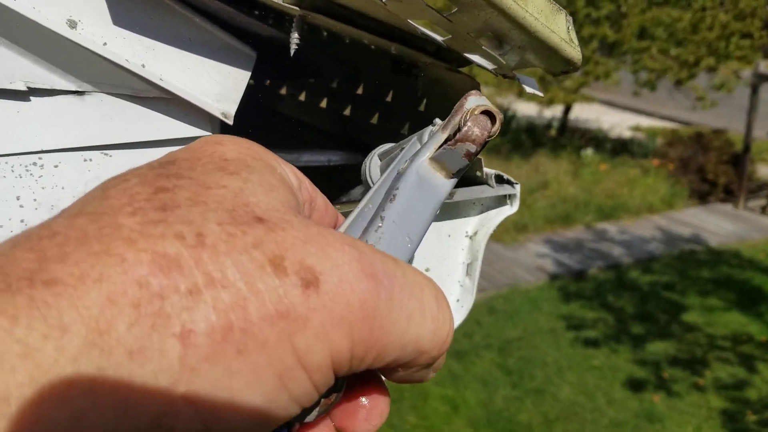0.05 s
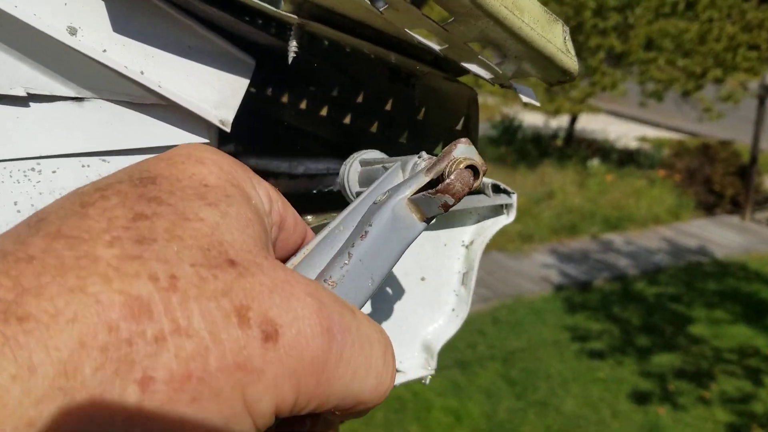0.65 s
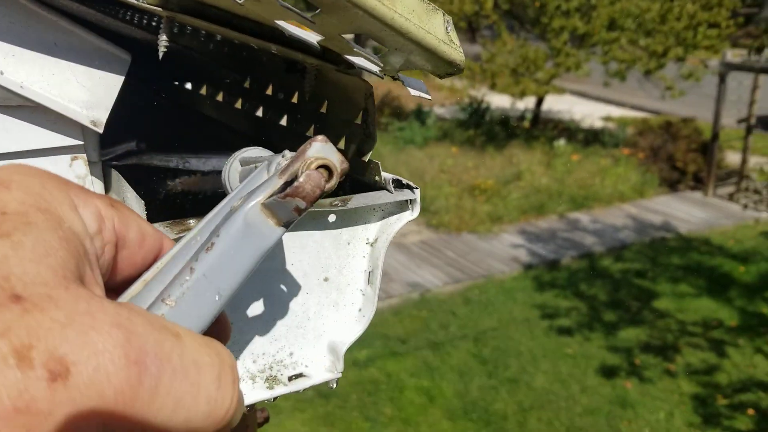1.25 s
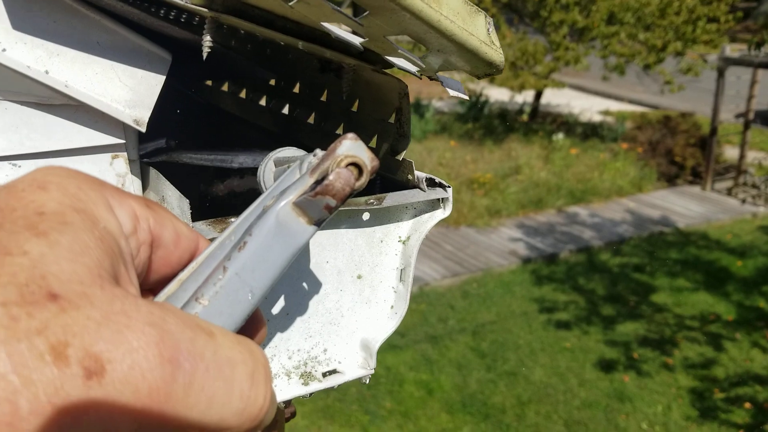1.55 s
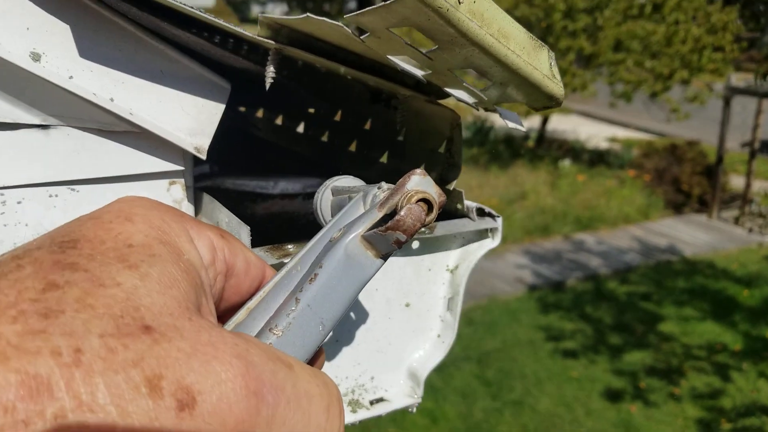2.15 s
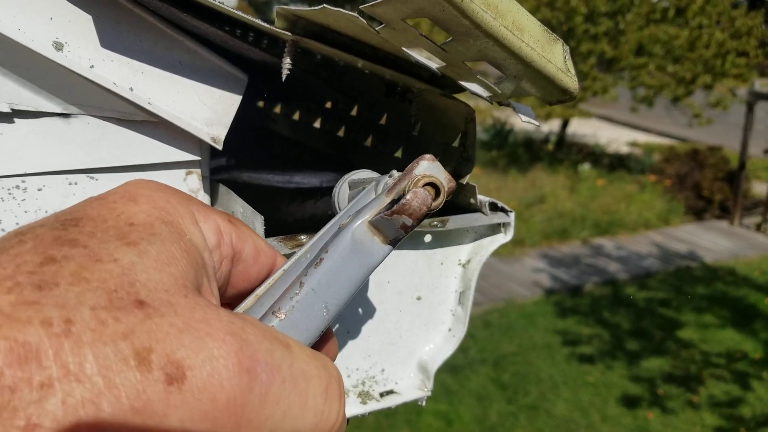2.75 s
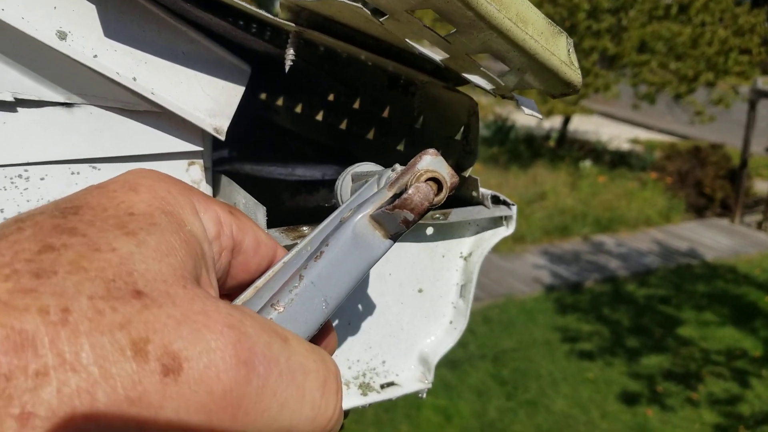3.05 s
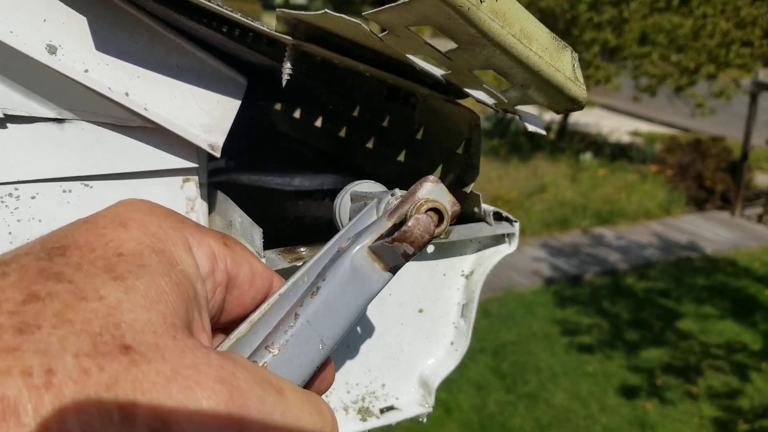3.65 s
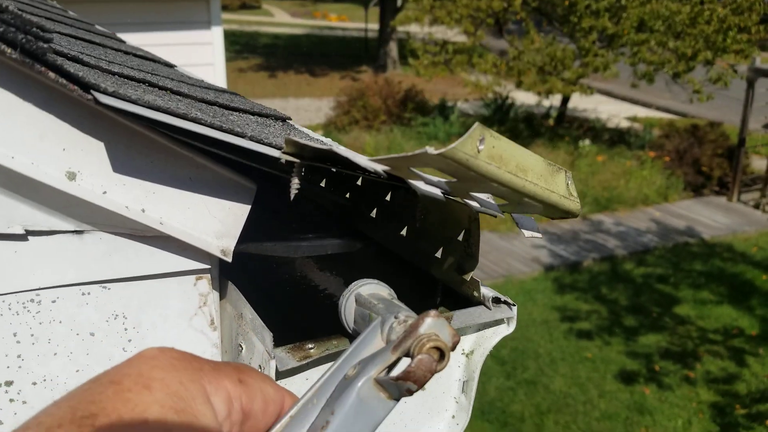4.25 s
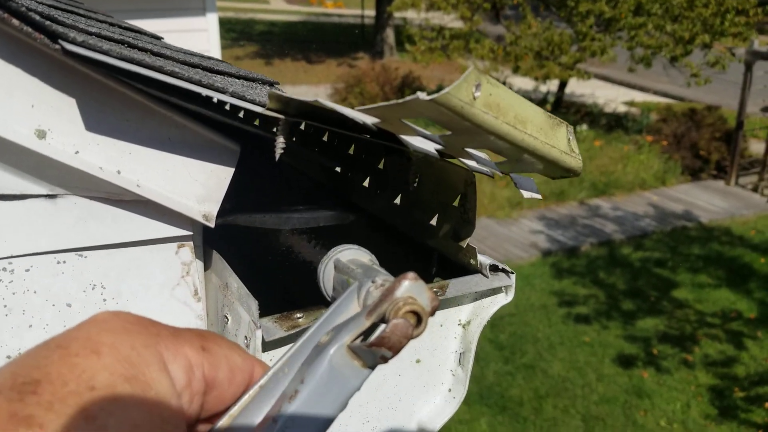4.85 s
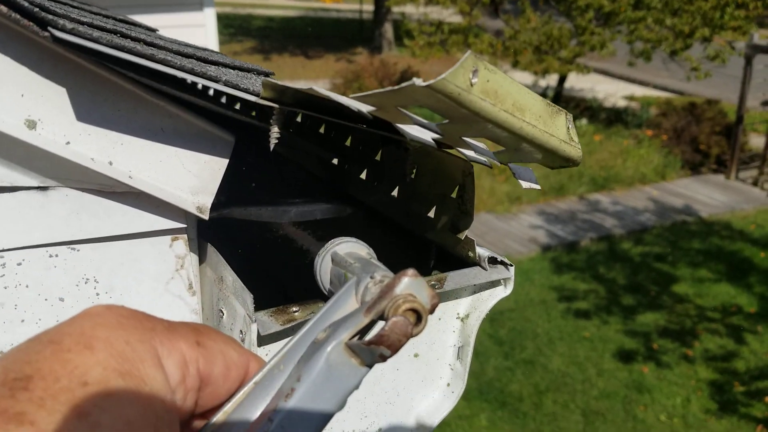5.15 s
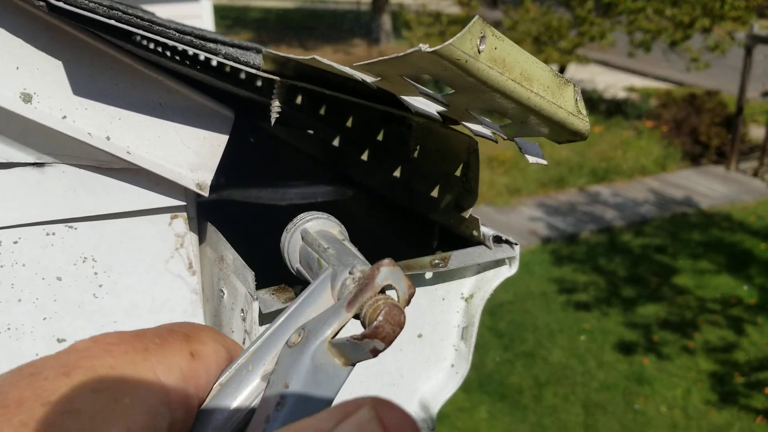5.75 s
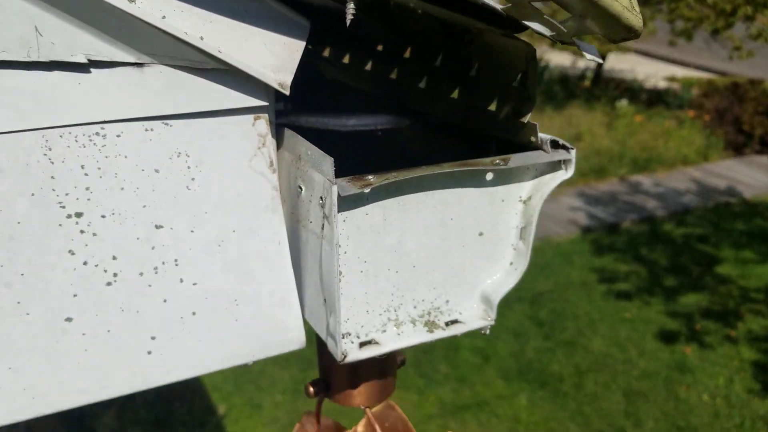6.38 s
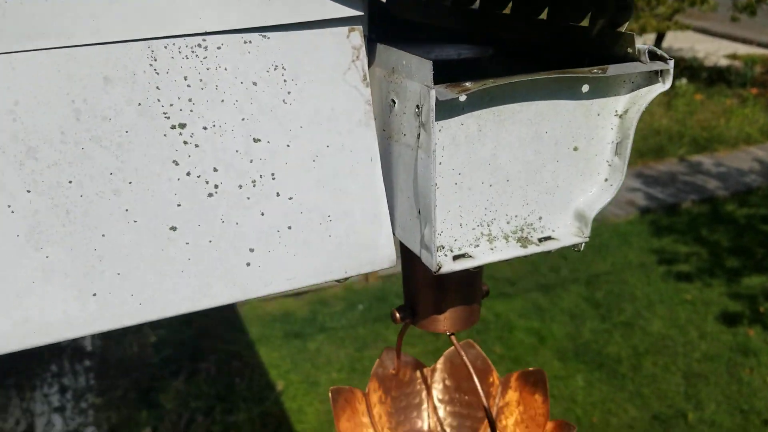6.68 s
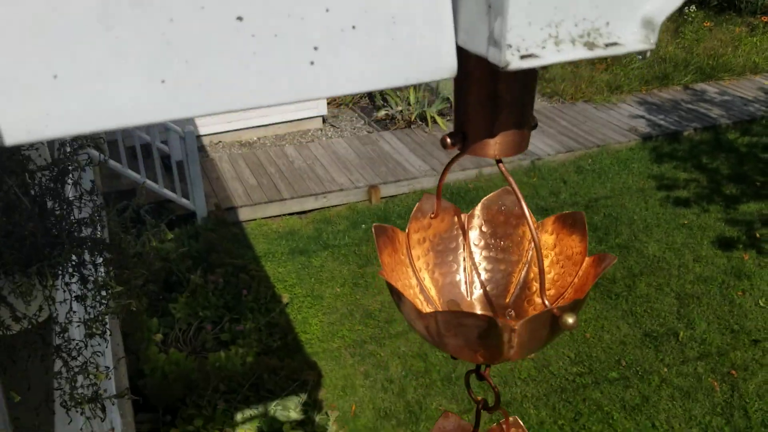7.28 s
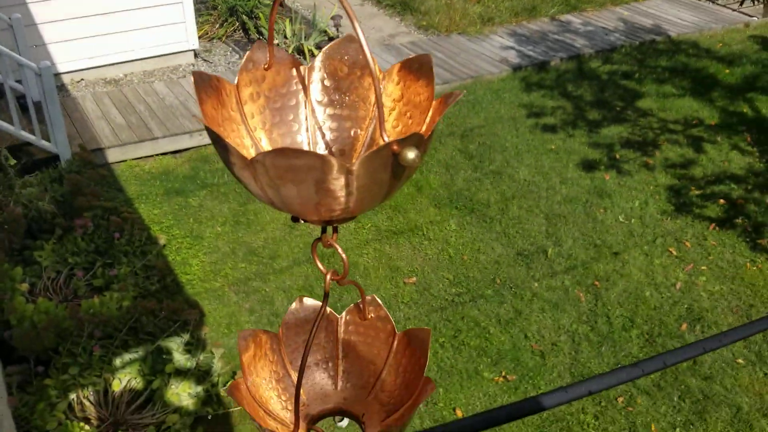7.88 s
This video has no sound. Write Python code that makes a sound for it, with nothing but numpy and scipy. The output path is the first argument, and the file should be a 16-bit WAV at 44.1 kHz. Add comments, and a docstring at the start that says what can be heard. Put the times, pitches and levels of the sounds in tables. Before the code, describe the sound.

A hose gun sprays into a metal gutter and shuts off with a whistle, then hose and gun scrape and knock against a metal ladder.

```python
"""In a quiet garden, a hose gun sprays into a sheet-metal roof gutter close by.
The drops hiss and drum on the metal, and a pool builds up and churns. The closing valve whistles
and spits, then the water drains off. The hose is lowered: it rasps over a hollow metal ladder,
and the gun knocks against it so that the rails ring. The air rumbles softly and a far engine hums."""
import sys
import numpy as np
from scipy import signal
from scipy.fft import rfft, irfft, next_fast_len
from scipy.io import wavfile

SR = 44100
rng = np.random.default_rng(int(sys.argv[2]) if len(sys.argv) > 2 else 0)


def wav_record(signal):
    """Record a signal, one row per channel, as 16-bit PCM in the file named by sys.argv[1]."""
    frames = np.transpose(np.atleast_2d(signal))
    bounded = np.clip(frames, -1, 1)
    # unit amplitude maps onto the largest positive 16-bit level
    quanta = np.round(bounded * 32767).astype(np.int16)
    wavfile.write(sys.argv[1], SR, quanta)


N = 358091
TIME = np.arange(N) / SR
SIZE = next_fast_len(N + SR // 4)
HZ = np.maximum(np.arange(SIZE // 2 + 1) * SR / SIZE, 1)   # the pitches of a spectrum
SWING_S, SWING_TAKES_S = 1.327, 0.088   # the jet swings from the gutter's wall onto its floor
SHUT_S = 5.52   # the valve is fully shut

# How alike left and right sound: pitch_hz, likeness (1 = the same)
LIKENESS = [(60, .72), (130, .84), (300, .96), (640, .9), (1400, .68), (3000, .55), (7000, .4), (15000, .4)]
# The jet catches an edge and flares: start_s, length_s, splash_lift_db, low_lift_db, high_lift_db
FLARES = [(-.1, 0.45, 5.5, 6.5, 2.5), (.75, 0.36, 3.5, 7, 7.5), (1.17, 0.095, 4, -13, 4.5),
          (1.5, 0.36, 2.5, 2, -4), (1.96, 0.26, 1, 13, -9), (4.44, 0.35, 1.8, 6, 0)]
# Notes at which the gutter's metal sheet rings: pitch_hz, width_hz, level_db
GUTTER_NOTES = [(572, 45, -7.5), (676, 34.6, 4), (835, 28, -4.5), (897, 22, 0.5), (991, 68, 0.5),
                (1355, 90, -0.5), (1492, 52, 2.5), (1551, 53, 1.5), (1818, 87, -4.5), (1957, 50, -1),
                (2185, 60, -3)]
# Notes of the gutter's hollow, stirred by pooled water: pitch_hz, width_hz, level_db
HOLLOW_NOTES = [(318, 27.8, -1.5), (394, 33.4, -2.5), (448, 47.5, 0), (528, 48, -1.5)]
# Notes at which the ladder rings: pitch_hz, width_hz, level_db
LADDER_NOTES = [(466, 21.6, 3.5), (494, 41, 0), (665, 86, -7), (755, 60, -2.5), (925, 21, 5),
                (1006, 16, 5.5), (1084, 22, 2), (1127, 8, 6), (1158, 140, -4), (1555, 36, 5),
                (1623, 13, -3), (2016, 14, 11.5), (2144, 69, 8), (2364, 41, 9), (2557, 40, 4.5),
                (2690, 12, 10.5), (2999, 13, 0), (3250, 33, 7.5), (3020, 1400, -6.5), (3450, 10, -4),
                (3480, 18, 5), (3800, 26, 5.5), (4334, 17, 3), (5330, 57, 1), (5810, 130, -3),
                (6230, 85, -7), (7050, 170, -10), (7280, 73, 1), (8010, 70, -3)]
# Tone of bare contact with the ladder, without ringing: pitch_hz, level_db
GRIT_TONE = [(60, -29), (300, -7), (900, -12.5), (1400, 3.5), (2500, -2.5), (5500, 5.5), (9000, 2),
             (13000, 4), (15800, 3)]


def from_db(db):
    """Turn decibels into a number to multiply by."""
    return 10 ** (np.asarray(db) / 20)


def ramp(start_s, takes_s):
    """Rise evenly from 0 to 1."""
    return np.clip((TIME - start_s) / takes_s, 0, 1)


def envelope(start_s, attack_s, length_s, fade_s):
    """Rise, hold until length_s after the start, then fade. A fade_s is always the time to lose 60 dB."""
    return ramp(start_s, attack_s) * from_db(-60 * np.clip((TIME - start_s - length_s) / fade_s, 0, 3))


def lifts(rows, attack_s, fade_s):
    """The decibels that events add over time, one curve for each of their dB columns."""
    return sum(np.outer(db, envelope(start_s, attack_s, length_s, fade_s))
               for start_s, length_s, *db in rows)


def over_time(points):
    """Join (time_s, value) points into a curve over time."""
    return np.interp(TIME, *np.transpose(points))


def over_hz(points):
    """Join (pitch_hz, value) points into a curve over pitch."""
    hz, value = np.transpose(points)
    return np.interp(np.log(HZ), np.log(hz), value)


def colour(x, db):
    """Turn each pitch up or down by db, with no sound ahead of its cause (a minimum-phase filter)."""
    cepstrum = irfft(np.log(from_db(db)), SIZE)
    cepstrum[1:SIZE // 2] *= 2
    cepstrum[SIZE // 2 + 1:] = 0
    return irfft(rfft(x, SIZE) * np.exp(rfft(cepstrum)), SIZE)[..., :N]


def band(x, low_hz, high_hz):
    """Keep the pitches between two limits."""
    return signal.sosfilt(signal.butter(2, [low_hz, high_hz], "band", fs=SR, output="sos"), x)


def unit(x):
    """Scale a stereo sound so that the average of its two sides has strength (rms) 1."""
    return x / (np.std(x.mean(0)) + 1e-12)


def drift(rate_hz):
    """Smooth random wandering, typically of size 1."""
    slow = irfft(rfft(rng.standard_normal(SIZE)) / (1 + (HZ / rate_hz) ** 2), SIZE)[:N]
    return slow / slow.std()


def resonate(x, notes):
    """Let x set an object's notes ringing; narrower notes ring longer."""
    out = 0
    for k, (hz, width_hz, db) in enumerate(notes):
        decay = np.exp(-np.pi * width_hz / SR)
        gain = (-1) ** k * from_db(db) * (1 - decay ** 2) / 2
        feedback = [1, -2 * decay * np.cos(2 * np.pi * hz / SR), decay ** 2]
        out = out + signal.lfilter([gain, 0, -gain], feedback, x)
    return out


def noise():
    """Stereo white noise, its two sides more alike in the bass than in the treble."""
    alike = np.clip(over_hz(LIKENESS), 0, 1)
    mid, side = rfft(rng.standard_normal((2, SIZE)))
    return irfft(mid + np.sqrt((1 - alike) / (1 + alike)) * side * [[1], [-1]], SIZE)[:, :N]


def grains(per_s, spread_db, life_s):
    """Tiny hits at random moments, mostly small and a few large, each a brief burst of noise."""
    sizes = from_db(spread_db * np.minimum(rng.exponential(1, N), 5))
    energy = (rng.random(N) < per_s / SR) * sizes ** 2
    bursts = signal.lfilter([1], [1, -np.exp(-2 / (life_s * SR))], energy + 1e-12)
    return unit(noise() * np.sqrt(bursts))


def spot_ring(drops, hz, width_hz):
    """The metal around the struck spot rings at a pitch that moves."""
    turn = np.exp(2j * np.pi * np.cumsum(hz) / SR)
    shifted_down = band(drops, 0.76 * hz.min(), 1.11 * hz.max()) / turn
    smoothed = signal.lfilter([1], [1, -np.exp(-np.pi * width_hz / SR)], shifted_down)
    return unit((smoothed * turn).real)   # shifted back up


def taps(per_s, spread_db):
    """Single fat drops snap on the bare metal."""
    sizes = from_db(spread_db * np.minimum(rng.exponential(1, N), 3)) * rng.choice([-1, 1], N)
    clicks = sizes * (rng.random(N) < per_s / SR)
    return unit(band(clicks, 1000, 8800) * np.ones((2, 1)))


def hiss(on_floor, closing):
    """Thousands of drops a second hiss and splash; those thrown back make the walls ring."""
    # Tone of the fine mist: pitch_hz, level_db
    mist_tone = [(4060, -29.5), (6900, -8), (7660, -13), (9170, -3), (10300, -1.5), (11500, 4.5),
                 (12900, 5), (15400, 3.5), (16300, -9)]
    # Tone of the splash: pitch_hz, level_db
    splash_tone = [(1410, -17.5), (2400, -1), (2690, -0.5), (3070, -4), (3300, -2), (4090, -1), (4440, 1.5),
                   (4880, -2.5), (5850, 0.5), (7650, -12.5), (8000, -9.5), (10400, -19), (17600, -120)]
    # How the mist swells and sinks: time_s, relative_level_db
    mist_swell = [(0.0, -23.5), (0.06, -25), (0.4, -31.5), (0.92, -31), (1.36, -32.5), (1.39, -33),
                  (1.72, -30), (4.8, -26), (5.15, -28)]
    # Note of the struck spot, moving with the aim: time_s, pitch_hz
    spot_pitch = [(.36, 3440), (.43, 2750), (1.2, 2640), (2.1, 3380), (3.6, 3600), (3.95, 4200),
                  (4.9, 4200), (5.3, 3560)]
    drops = grains(per_s=10000, spread_db=2, life_s=0.00062) * from_db(0.58 * drift(27))
    rebound = grains(per_s=7400, spread_db=2, life_s=0.00012)
    flare_db, low_lift_db, high_lift_db = lifts(FLARES, attack_s=0.066, fade_s=0.32)
    low_hz = over_time(spot_pitch)
    middle_hz = 5750 * (low_hz / 3560) ** 0.18
    top_hz = 12500 * (low_hz / 3560) ** 0.87
    low_gain = from_db(-6.5 - 12.5 * on_floor + low_lift_db)   # the wet floor damps the two lower rings
    middle_gain = from_db(1 - 5 * on_floor + high_lift_db)
    top_gain = from_db(-14 + 1.5 * on_floor + high_lift_db)
    low_ring = low_gain * spot_ring(rebound, low_hz, width_hz=450)
    middle_ring = middle_gain * spot_ring(rebound, middle_hz, width_hz=750)
    top_ring = top_gain * spot_ring(rebound, top_hz, width_hz=580)
    patter = from_db(-9) * low_gain * unit(band(drops, 1080, 2400))
    # dividing lets the rings colour the hiss without making it louder
    mist = (unit(colour(drops, over_hz(mist_tone))) + top_ring) / np.hypot(1, top_gain)
    splash = unit(colour(drops, over_hz(splash_tone))) + low_ring + middle_ring + patter
    splash /= np.sqrt(1 + low_gain ** 2 + middle_gain ** 2)
    splash += from_db(-12) * taps(per_s=130, spread_db=3.5)
    mist_db = over_time(mist_swell) + 1.5 - 3.5 * closing + 0.5 * drift(15)
    splash_db = -33 + 2.5 * on_floor + flare_db - 5.5 * closing + 0.45 * drift(27)
    return from_db(mist_db) * mist + from_db(splash_db) * splash


def drumming(on_floor, closing):
    """Heavier lumps of water drum on the metal and churn in the hollow, louder as a pool builds up."""
    # The pool sloshes: start_s, length_s, lift_db
    sloshes = [(.62, .5, 4.5), (1.95, 0.051, 4), (2.4, .13, 4), (4.94, 0.057, 6), (5.12, 0.076, 3)]
    fill_s = 0.53
    pool = 1 - np.exp(-np.maximum(TIME - SWING_S - SWING_TAKES_S, 0) / fill_s)
    slosh_db, = lifts(sloshes, attack_s=0.082, fade_s=0.19)
    flare_db = lifts(FLARES, attack_s=0.066, fade_s=0.32)[0]
    wall_shake_db = 1.24 * flare_db * (1 - on_floor)
    drum_db = -52 + 14 * on_floor + 5.5 * pool + wall_shake_db - 9 * closing
    churn_db = -48 + 4 * on_floor + 7 * pool + slosh_db - 8 * closing
    lumps = grains(per_s=2000, spread_db=1.5, life_s=0.001)
    drum = from_db(drum_db) * unit(resonate(lumps, GUTTER_NOTES))
    churn = from_db(churn_db) * unit(band(resonate(lumps, HOLLOW_NOTES), 206, 550))
    return drum + churn


def spray():
    """The jet strikes the gutter's wall, then its floor, and weakens and stops as the valve shuts."""
    on_floor = ramp(SWING_S, SWING_TAKES_S)
    closing = ramp(start_s=5.15, takes_s=0.29)
    flow = from_db(-60 * np.clip((TIME - SHUT_S) / 0.1, 0, 2))
    mid_swing = ramp(SWING_S - 0.054, 0.054) * (1 - on_floor)   # the jet finds little to strike
    falter = envelope(start_s=5.34, attack_s=0.025, length_s=0.057, fade_s=0.06)
    dip_db = -2 * (mid_swing + falter)
    return flow * from_db(dip_db) * (hiss(on_floor, closing) + drumming(on_floor, closing))


def garden_air():
    """A low outdoor rumble, louder down by the ladder than up at the gutter."""
    # Tone of the garden air: pitch_hz, level_db
    air_tone = [(15, -59), (25, -23), (54, 3), (112, -1), (156, -5), (261, -11), (487, -18.5), (830, -24),
                (1090, -13), (1180, -27), (2000, -40), (2600, -78), (4400, -120)]
    lowered = ramp(start_s=5.2, takes_s=2.3)
    level_db = -55.5 + 5.5 * lowered + 2.6 * drift(4.5)
    return from_db(level_db) * unit(colour(noise(), over_hz(air_tone)))


def far_engine(pitch_hz):
    """A far engine idles on one wavering note, then swells once."""
    phase = 2 * np.pi * np.cumsum(pitch_hz + 0.8 * drift(4.7)) / SR
    swell = envelope(start_s=7.52, attack_s=0.22, length_s=0.33, fade_s=1.5)
    effort = from_db(-67.5) + from_db(-47.5) * swell
    return effort * from_db(1.5 * drift(5)) * np.sqrt(2) * np.sin(phase)


def plops(swell_s):
    """Short, round tones: soft bumps of the hand, a gulp of water, a drip and the ladder's low boom."""
    # One tone a row: start_s, pitch_hz, peak_db, fade_s, glide_octaves_per_s
    tones = [(1.215, 62, -41, .2, 0), (5.426, 625, -26.5, 0.05, 1), (6.299, 66, -42, 0.1, -7),
             (7.662, 4570, -46, .04, -12), (7.805, 332, -40, 0.46, 1)]
    out = np.zeros(N)
    for start_s, hz, peak_db, fade_s, glide in tones:
        t = np.clip(TIME - start_s, 0, 0.5)
        shape = (1 - np.exp(-t / swell_s)) * from_db(-60 * t / fade_s)
        phase = 2 * np.pi * hz * t * 2 ** (glide * t / 2)
        out += from_db(peak_db) * shape / shape.max() * np.sin(phase)
    return out


def valve():
    """Water squeezed through the closing valve whistles hoarsely, then spits out a last spurt."""
    # Notes of the narrowing gap: pitch_hz, width_hz, level_db
    valve_notes = [(5620, 140, 6), (11400, 260, -9), (3100, 62, -1)]
    whistle = from_db(-26.5) * unit(resonate(noise(), valve_notes))
    whistle *= envelope(start_s=5.259, attack_s=0.071, length_s=0.093, fade_s=0.05)
    rush = noise()
    mist = from_db(-22) * unit(band(rush, 10000, 14600))
    spit = from_db(-29) * unit(band(rush, 2000, 7500))
    return whistle + (mist + spit) * envelope(start_s=5.3, attack_s=0.03, length_s=0.04, fade_s=0.08)


def metal_shimmer(x, fade_s, ring_db):
    """Thin metal has countless faint notes, so a short shimmer follows every touch."""
    t = TIME[:SR // 3]
    shimmer = band(rng.standard_normal((2, len(t))), 1200, 19400) * from_db(-60 * t / fade_s)
    shimmer *= from_db(ring_db) / np.sqrt(np.sum(shimmer ** 2) / 2)
    return (x + signal.fftconvolve(x, shimmer, axes=1)[:, :N]) / np.hypot(1, from_db(ring_db))


def knocks():
    """The gun and hose hit the ladder: each crack and rattle has a ping and a thud, and the rails ring."""
    # Knocks, catches and squeaks (thud and ping levels are relative to the treble):
    # start_s, level_db, thud_hz, thud_db, ping_hz, ping_width_hz, ping_db, fade_s
    hits = [(5.415, -17, 910, -6, 6500, 900, -17, 0.022), (5.7348, -37.5, 500, 5, 3560, 40, -2, 0.055),
            (5.7603, -26.5, 497, -3, 3630, 32, -5, 0.17), (5.978, -34, 2840, -8, 640, 43, 7, 0.12),
            (6.019, -39.5, 3140, 2, 646, 16, 10, .2), (6.0915, -39.5, 900, -6, 3780, 60, -9, 0.13),
            (6.235, -43, 900, -14, 5900, 300, 0, .08), (6.610, -18.5, 1000, -12, 5380, 340, 1, 0.12),
            (6.628, -18.5, 1000, -1, 4020, 220, -1, 0.1), (6.7175, -13, 1170, -0.5, 3510, 45, -9, 0.059),
            (6.785, -27, 1090, 2.5, 2080, 120, -13, 0.52), (7.0932, -14, 690, 2, 2600, 27, -4, 0.044),
            (7.2454, -17, 890, -6, 5750, 400, -8, 0.12), (7.321, -16, 970, -8, 3050, 340, -4, 0.15),
            (7.376, -10.5, 1000, -13, 5770, 130, 11, 0.043),
            (7.561, -22.5, 1000, -8, 6800, 900, -12, 0.041),
            (7.6215, -27.5, 1550, -10, 2420, 290, 4, 0.047), (7.7995, -16, 341.6, 12.5, 2557, 130, 0, 0.17),
            (7.8145, -5.5, 1220, 7, 5210, 250, 11.5, 0.069), (8.055, -34, 1005, 4, 3200, 300, -10, 0.18),
            (8.102, -29, 1000, 0, 4300, 200, -13, 0.23)]
    out, length = np.zeros((2, N + SR)), SR // 2
    t, white = TIME[:length], noise()
    rough = colour(white, over_hz(GRIT_TONE))
    for k, (start_s, db, thud_hz, thud_db, ping_hz, ping_width_hz, ping_db, fade_s) in enumerate(hits):
        stretch = slice(k * SR // 4, k * SR // 4 + length)   # each knock starts a quarter second further along the same noise
        rattle = from_db(-60 * t / fade_s)
        crack = from_db(-9 - 60 * t / (0.13 * fade_s))
        push = white[:, stretch] * (rattle + crack)
        contact = rough[:, stretch] * (rattle + crack)
        rails = resonate(push, LADDER_NOTES)
        treble = unit(band(contact, 300, 12100)) + from_db(-3) * unit(band(rails, 1740, 9700))
        ping = unit(resonate(push, [(ping_hz, ping_width_hz, 0)]))
        thud = unit(resonate(rails + 0.33 * push, [(thud_hz, 320, 0)]))
        hit = treble + from_db(ping_db) * ping + from_db(thud_db) * thud
        rough_peak = 3 * np.std(hit.mean(0)[:round(fade_s * SR / 8)])
        at = round(start_s * SR)
        out[:, at:at + length] += from_db(db) * hit / rough_peak
    return metal_shimmer(out[:, :N], fade_s=0.15, ring_db=-13)


def runoff():
    """A thin film of water fizzes down the murmuring gutter; the pool drains once the valve is shut."""
    # Tone of trickling water: pitch_hz, level_db
    trickle_tone = [(1060, -53), (1800, -25), (2060, 2), (3020, -5.5), (3490, -2), (4630, -5.5), (5610, 2),
                    (7040, -4), (7710, -14), (8360, -4), (9670, -3), (10600, -7.5), (15800, -5.5)]
    # Trickles that swell the film: start_s, length_s, level_db
    trickles = [(5.72, .42, -54.5), (6.42, 1.7, -59)]
    water = noise()
    fizz = unit(colour(water, over_hz(trickle_tone)))
    murmur = from_db(-5.5) * unit(resonate(water, GUTTER_NOTES + HOLLOW_NOTES))
    film = from_db(-59)
    drain = from_db(-48.5 - 60 * np.maximum(TIME - SHUT_S, 0) / 0.35)
    trickle_power = sum((from_db(db) * envelope(start_s, 0.098, length_s, fade_s=0.9)) ** 2
                        for start_s, length_s, db in trickles)
    return np.sqrt(film ** 2 + drain ** 2 + trickle_power) * (fizz + murmur)


def hose_slide():
    """Pull by pull the hose sticks and slips on the rungs; the hollow rails ring along."""
    # Pulls of the hose (body and grit levels are relative to the pull's strength):
    # start_s, attack_s, length_s, strength_db, slowing_s, body_db, grit_db
    pulls = [(6.45, 0.073, .1, -48.5, .1, -3, -6), (6.532, 0.042, 0.091, -32.5, 0.27, -2.5, -2),
             (6.693, 0.025, 0.11, -32.5, .33, -3, -11), (6.836, .025, 0.026, -35.5, 0.12, -3.5, -5),
             (7.108, 0.037, 0.13, -37.5, .12, 0.5, -8), (7.217, 0.027, 0.13, -25, 0.36, -4, -6.5),
             (7.262, .055, 0.069, -22.5, 0.053, -20, 1), (7.38, 0.11, 0.14, -37, .08, 2, -14),
             (7.562, 0.028, .2, -51.5, .1, 0, -4), (7.745, 0.081, 0.5, -44, .2, -1.5, -4),
             (7.791, .035, .045, -32.5, 0.22, -2, -14)]
    power = 0
    for start_s, attack_s, length_s, db, slowing_s, body_db, grit_db in pulls:
        speed = 1 - ramp(start_s + length_s, slowing_s)
        rubbing = ramp(start_s, attack_s) * speed ** 2.14
        power = power + np.outer(from_db([db, db + body_db, db + grit_db]), rubbing) ** 2
    rasp_gain, body_gain, grit_gain = np.sqrt(power)
    slips = grains(per_s=2500, spread_db=1.5, life_s=0.00056) * from_db(1.5 * drift(56))
    contact = colour(slips, over_hz(GRIT_TONE))
    rails = resonate(slips, LADDER_NOTES) + from_db(-12.5) * contact
    deep_db = -7.5 + 5 * (TIME - pulls[0][0])   # the deepest notes grow as the hose moves along
    deep = from_db(deep_db) * unit(band(rails, 386, 800))
    body = body_gain * from_db(-2.5) * (unit(band(rails, 1000, 1540)) + deep)
    rasp = rasp_gain * from_db(-2) * unit(band(rails, 1680, 6700))
    grit = grit_gain * from_db(-2.5) * unit(band(contact, 3500, 13700))
    return body + metal_shimmer(rasp + grit, fade_s=0.04, ring_db=-2)


def place(x, balance):
    """The microphone's body shades one side and delays the other; the centre keeps its level."""
    # How far the left side's wave runs ahead of the right: pitch_hz, lead_radians
    left_lead = [(0, -2), (1120, -0.9), (1810, 0.2), (4570, 2.5), (5080, 8), (5600, 2.5), (6290, 5.5),
                 (6980, 5.5), (8010, 9.5), (9040, 12), (10200, 11), (10900, 18), (11200, 13), (16600, 11)]
    lean_db, alike = over_hz(balance), over_hz(LIKENESS)
    lead = np.interp(HZ, *np.transpose(left_lead))
    lead *= np.clip(HZ / 1000 - 1, 0, 1)   # long waves reach both sides together
    centre_power = from_db(lean_db) + from_db(-lean_db) + 2 * alike * np.cos(lead)
    centre_db = 10 * np.log10(centre_power / (2 + 2 * alike))
    left = irfft(rfft(x[0], SIZE) * np.exp(1j * lead), SIZE)[:N]
    return np.array([colour(left, lean_db / 2 - centre_db), colour(x[1], -lean_db / 2 - centre_db)])


def scene():
    """The gutter is ahead and to the right, the ladder just below."""
    # Balance of sound from the gutter: pitch_hz, left_minus_right_db
    gutter_balance = [(60, 0.5), (92, 2.5), (140, 2.5), (210, 2), (330, 1.5), (500, 3.5), (770, 2),
                      (1170, 2), (1790, -0.5), (2740, -4), (4190, -17), (6410, -10.5), (9810, 0.5),
                      (15000, -17.5)]
    # Balance of sound from the ladder: pitch_hz, left_minus_right_db
    ladder_balance = [(60, 16), (99, 9), (160, 4), (270, 2), (450, 0), (740, 1), (1220, -1), (2010, -4),
                      (3330, -10.5), (5500, -15.5), (9080, -2.5), (15000, -9)]
    ahead = spray() + valve() + runoff() + garden_air() + far_engine(pitch_hz=115.7)
    ahead += plops(swell_s=0.0027)
    below = hose_slide() + knocks()
    return place(ahead, gutter_balance) + place(below, ladder_balance)


def record(dry):
    """Clip any peak beyond full scale, then cut the highest treble steeply."""
    cutoff_hz = 15900
    passed = 1 / np.sqrt(1 + (HZ / cutoff_hz) ** 300)
    return irfft(rfft(np.clip(dry, -1, 1), SIZE) * passed, SIZE)[:, :N]


dry = scene()
out = record(dry)
wav_record(out)
```